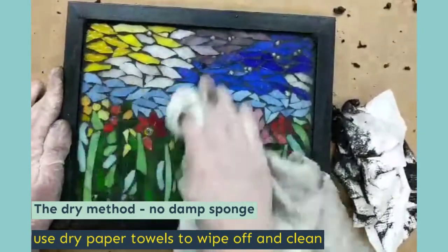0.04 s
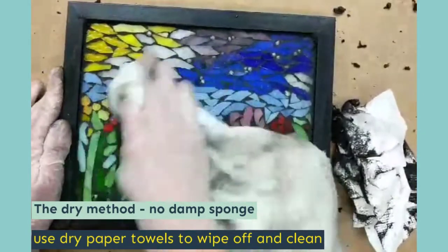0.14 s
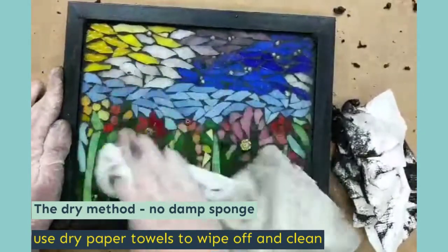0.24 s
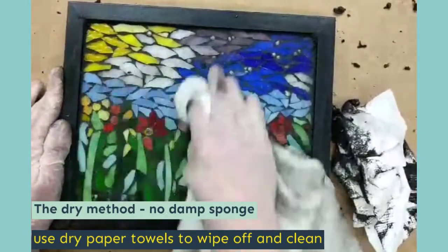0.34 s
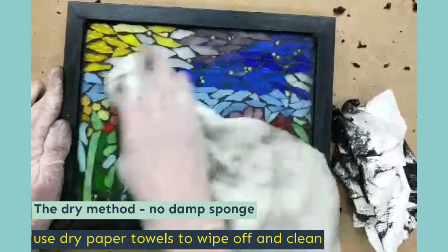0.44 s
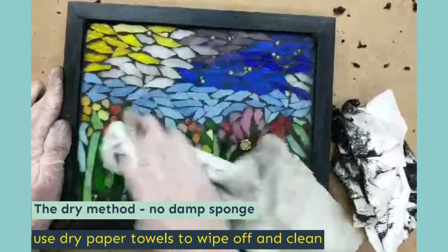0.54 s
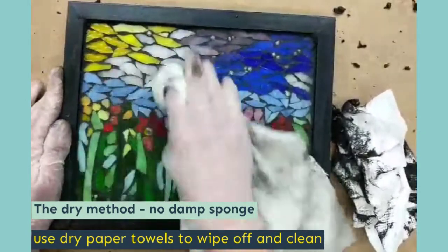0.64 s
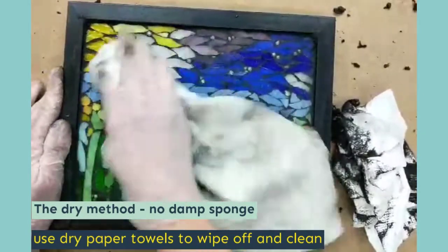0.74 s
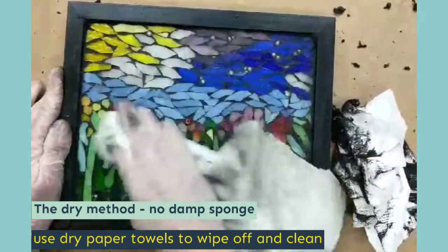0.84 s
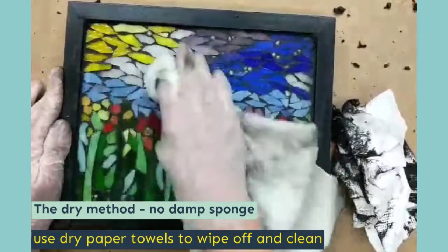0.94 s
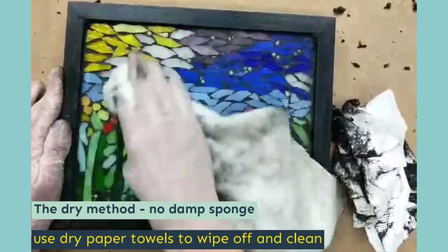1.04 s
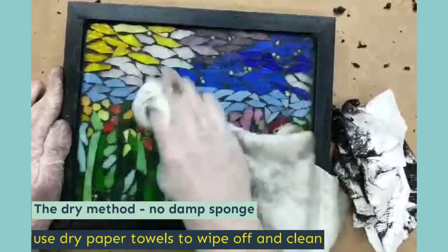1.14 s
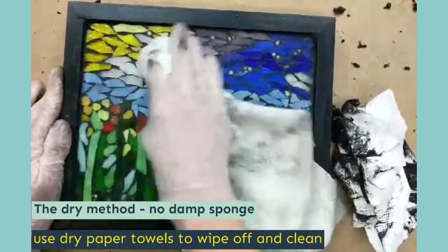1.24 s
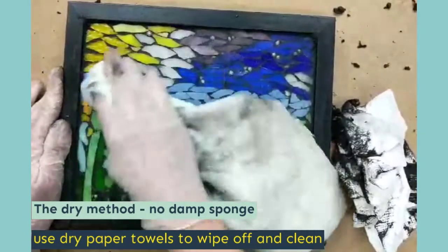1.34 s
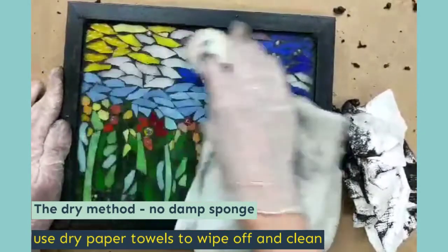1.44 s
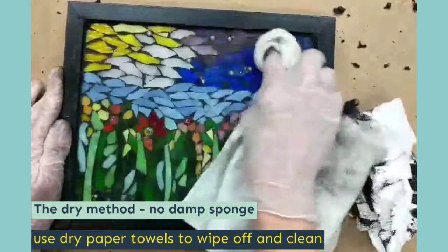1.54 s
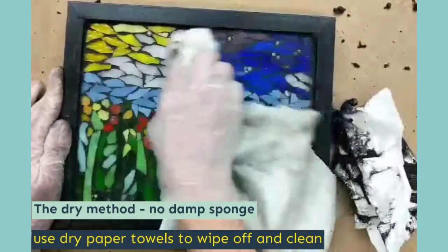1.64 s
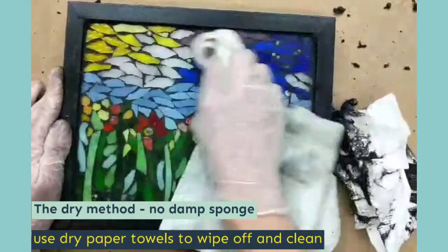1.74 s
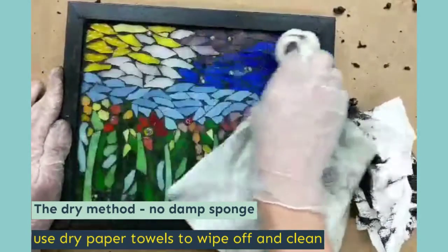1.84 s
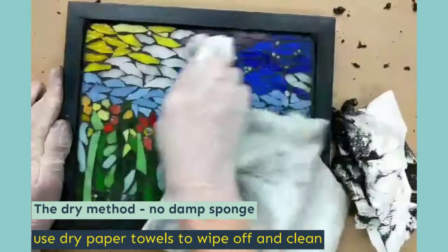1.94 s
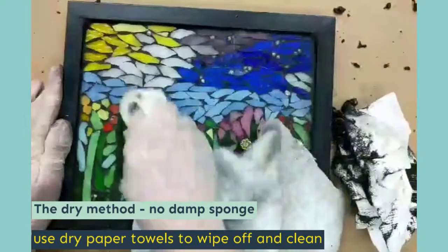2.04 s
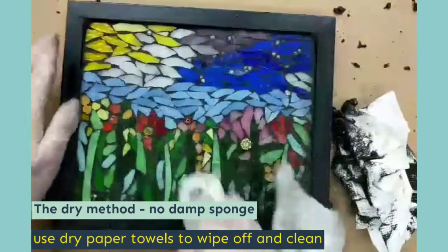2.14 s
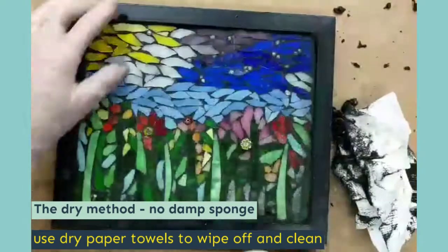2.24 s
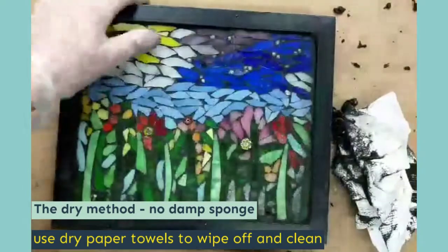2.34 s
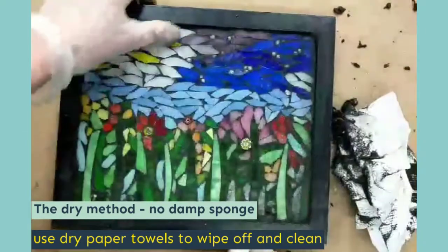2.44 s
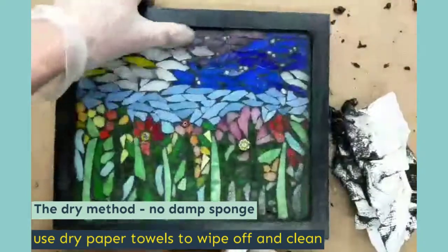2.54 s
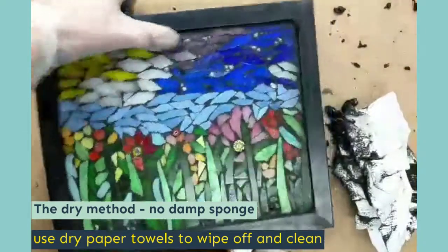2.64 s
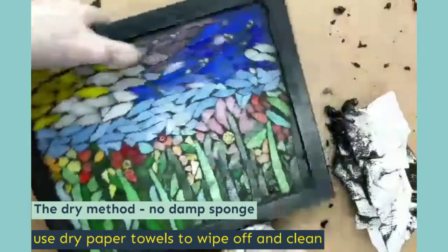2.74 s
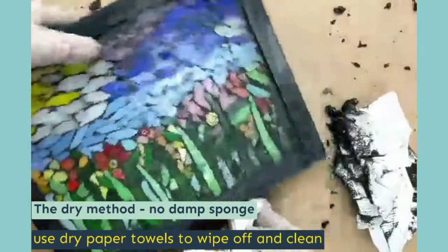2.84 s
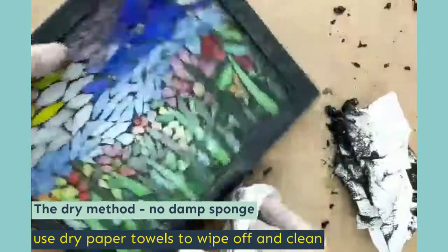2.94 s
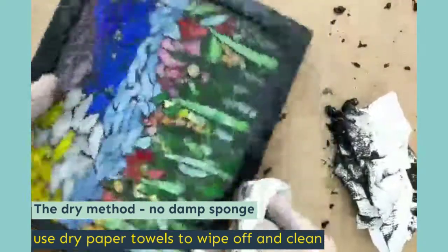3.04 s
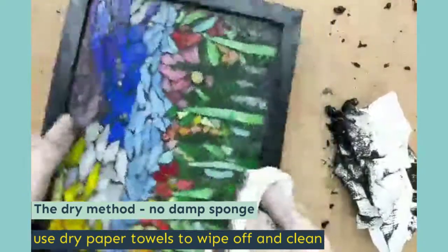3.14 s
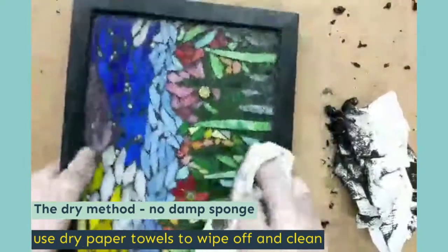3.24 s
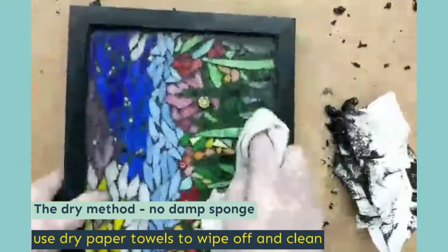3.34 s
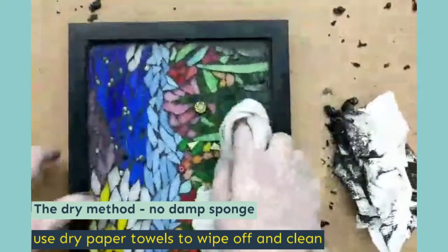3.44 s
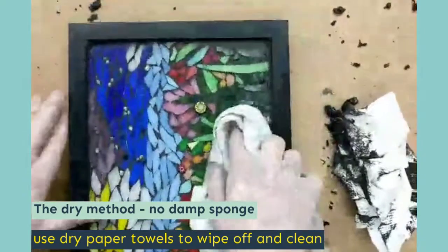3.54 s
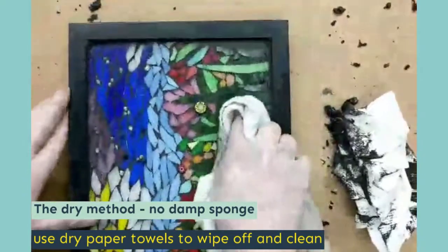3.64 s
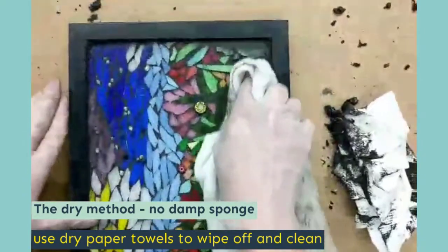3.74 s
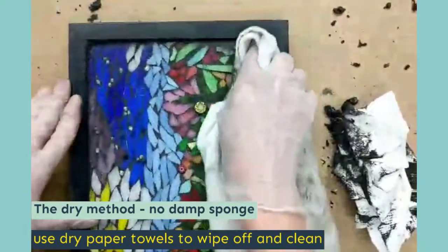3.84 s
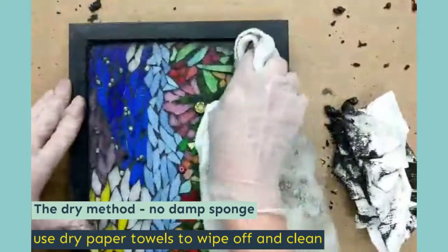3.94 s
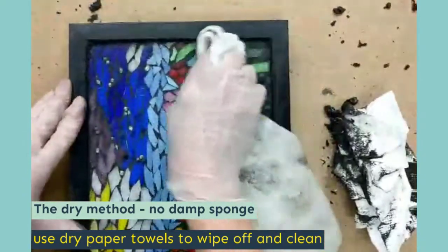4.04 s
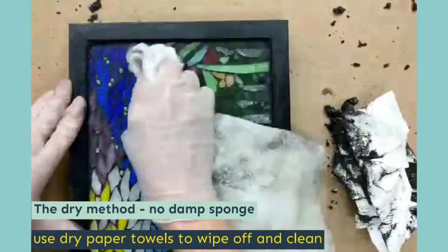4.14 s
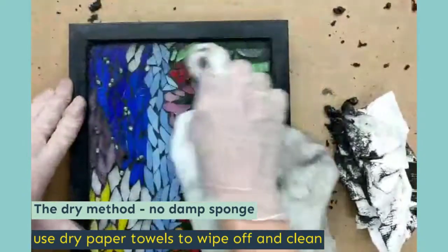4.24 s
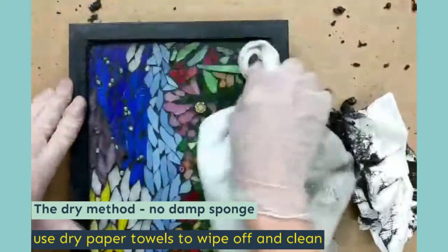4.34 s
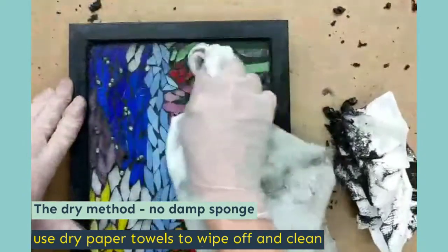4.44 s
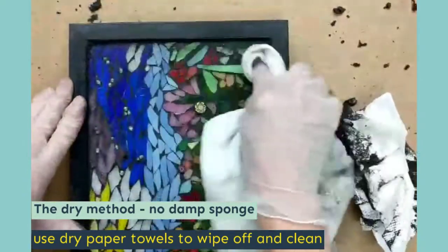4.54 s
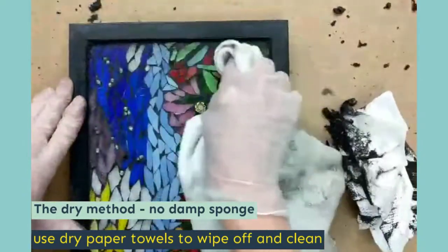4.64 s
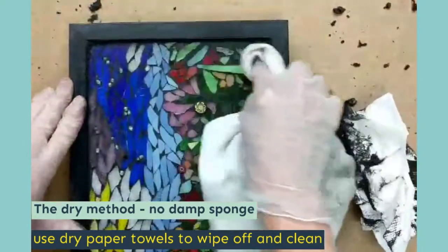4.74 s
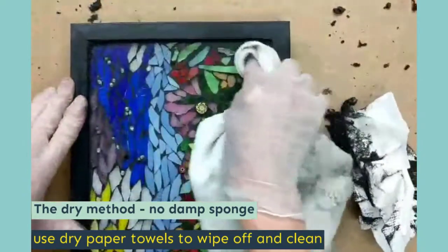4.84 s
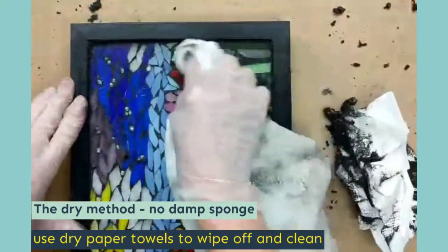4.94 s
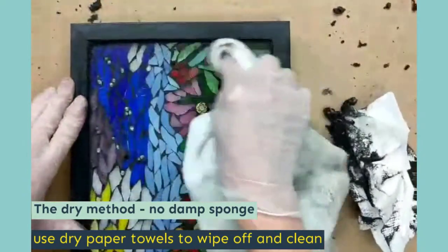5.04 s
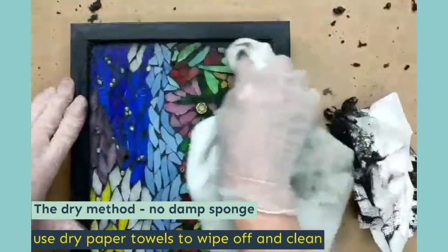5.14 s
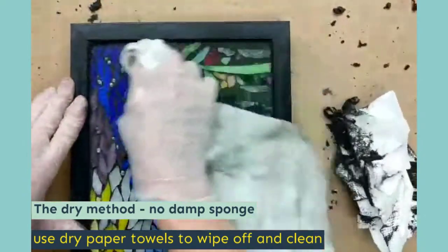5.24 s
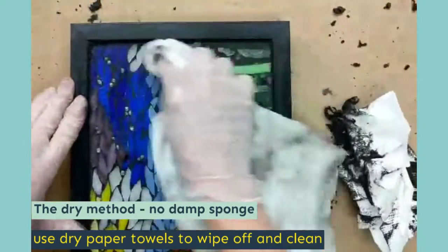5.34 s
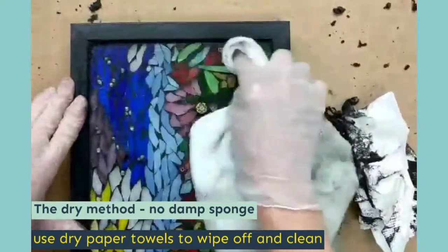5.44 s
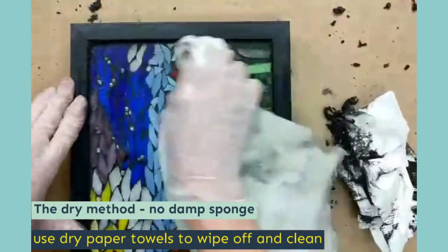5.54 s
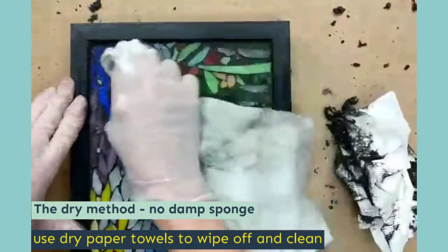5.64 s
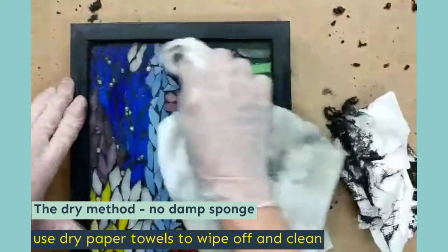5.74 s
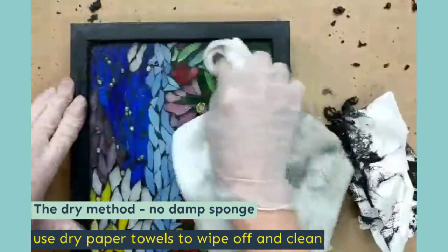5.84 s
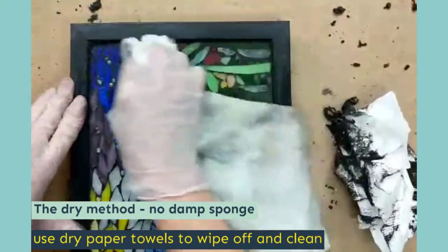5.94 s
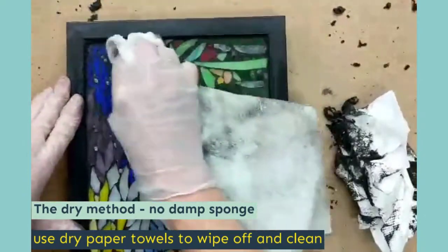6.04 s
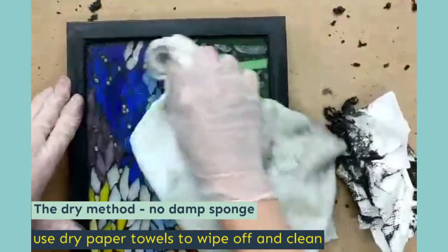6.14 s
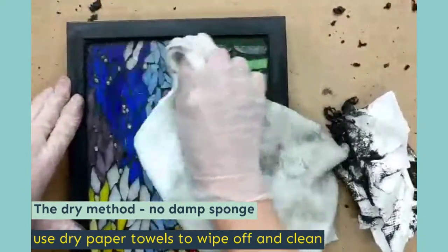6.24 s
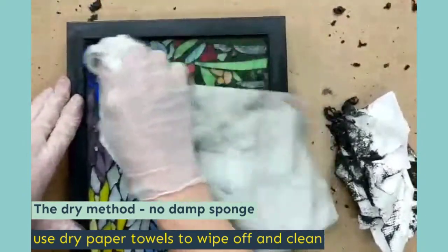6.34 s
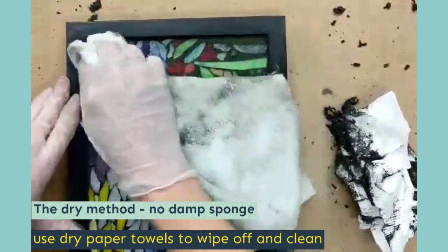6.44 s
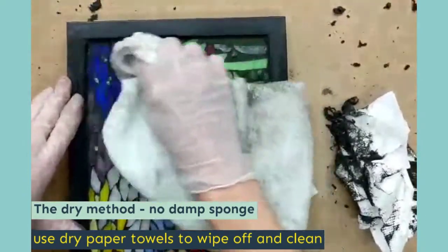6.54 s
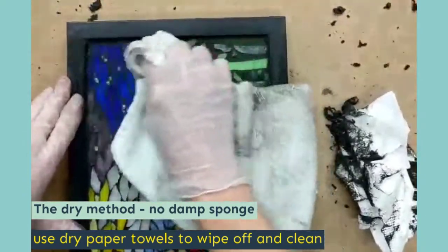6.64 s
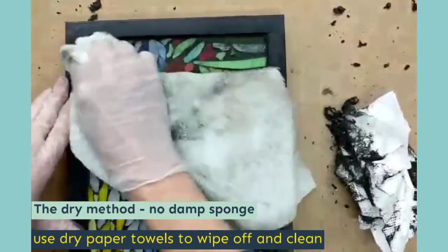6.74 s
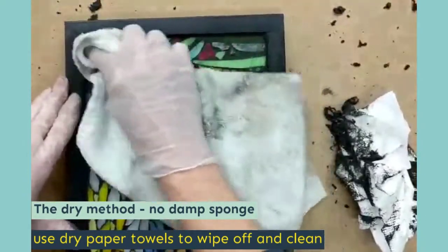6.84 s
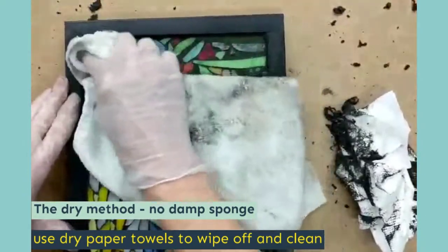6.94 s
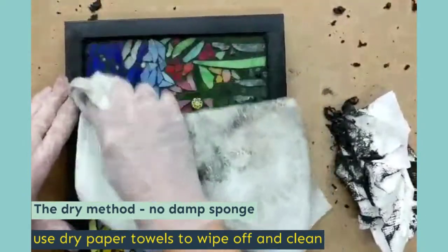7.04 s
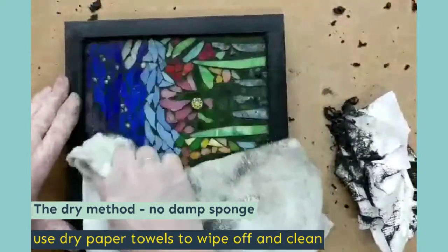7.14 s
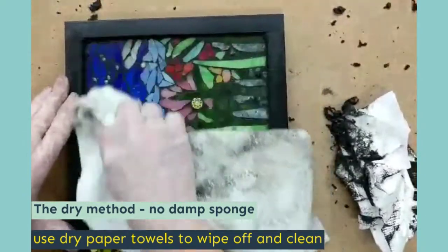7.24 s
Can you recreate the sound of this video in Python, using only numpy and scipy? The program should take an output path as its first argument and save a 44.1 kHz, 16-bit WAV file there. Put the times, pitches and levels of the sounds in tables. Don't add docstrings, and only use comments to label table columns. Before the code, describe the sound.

Dry paper towel scrubs glass tiles in quick hissing strokes, then a wooden frame scrapes round over grit, drops flat, and brighter rubbing resumes.

```python
import sys
import numpy as np
from scipy import signal
from scipy.fft import rfft, irfft
from scipy.io import wavfile
from scipy.ndimage import uniform_filter1d

SR = 44100
rng = np.random.default_rng(int(sys.argv[2]) if len(sys.argv) > 2 else 0)


def decibels_to_gain(level_db):
    exponent = np.asarray(level_db, float) / 20
    return 10 ** exponent


def transcribe(signal):
    frames = np.atleast_2d(signal).T
    limited = np.clip(frames, -1, 1)
    pcm = np.round(limited * 32767).astype(np.int16)
    wavfile.write(sys.argv[1], SR, pcm)


N = 321048

# frequency in Hz, level in dB per Hz.
AIR_SPECTRUM = [(24, -56.5), (40, -18), (100, 2.5), (933, -8.5), (3220, -11), (6950, -25.5), (13300, -13),
                (15000, -39)]
# frequency in Hz, t60 in seconds.
ROOM_DECAY = [(100, .35), (400, 0.39), (2000, 0.17), (10000, 0.096)]
# start in seconds, peak in dB.
TABLE_ROCKS = [(0.114, -62), (0.409, -61), (0.711, -62), (0.992, -69), (1.282, -62), (1.888, -61),
               (2.379, -63), (4.998, -63), (5.289, -57), (5.676, -60.5), (5.98, -60), (6.426, -58),
               (6.77, -54.5), (7.179, -60)]
# start in
# seconds, peak in dB, ring in Hz, t60 in seconds.
FRAME_KNOCKS = [(0.128, -41, 220, .05), (0.398, -39, 230, 0.065), (0.712, -41, 260, .06),
                (0.924, -40, 400, 0.028), (1.262, -42, 260, .06), (2.02, -38, 220, .08),
                (1.488, -35, 233, 0.071), (1.691, -36, 218, 0.047), (2.43, -30, 302, 0.021),
                (2.507, -32.5, 355, 0.059), (2.6, -27, 397, 0.042), (2.726, -28, 612, 0.065),
                (2.775, -13, 571, 0.038), (2.84, -24, 508, 0.062), (3.252, -19.5, 210, 0.018),
                (3.318, -11.5, 578, 0.027), (4.342, -21, 201, 0.013), (4.587, -45.5, 209, 0.082),
                (4.852, -40.5, 274, 0.05), (4.981, -47, 473, 0.11), (5.439, -36.5, 566, 0.035),
                (6.088, -24.5, 380, 0.033), (6.807, -44, 347, 0.074)]
# frequency in Hz, level in dB, t60 in seconds.
TABLE_RING = [(117.8, -25, 0.098), (166.4, -28, 0.17), (323, -35, 0.29), (351, -35, 0.044),
              (417, -34, 0.05)]
# start in seconds, peak in dB, pitch in Hz, t60 in seconds.
FRAME_PINGS = [(2.751, -28, 2150, .015), (2.7555, -26, 1480, .02), (2.759, -30, 2900, .012),
               (2.7745, -17, 1950, .015), (2.7773, -16, 1475, .022), (2.7773, -9, 1880, .024),
               (2.785, -27, 2950, .02), (2.787, -22, 2150, .02), (2.787, -27, 480, .04),
               (2.814, -26, 560, .04), (2.853, -24, 540, .04), (3.252, -29, 2020, .02),
               (3.252, -31, 2450, .03), (3.253, -29, 480, .04), (3.254, -30, 680, .03),
               (3.263, -38, 1720, .03), (3.264, -40, 2500, .02), (3.267, -35, 450, .03),
               (3.308, -32, 520, .04), (3.3155, -28, 1950, .02), (3.316, -36, 2900, .015),
               (3.317, -24, 230, .06), (3.328, -28, 400, .03), (3.336, -33, 600, .04),
               (3.35, -34, 210, .09), (3.362, -35, 1950, .015), (3.407, -35, 560, .04),
               (3.418, -33, 530, .04), (3.422, -30, 2000, .03), (3.427, -32, 980, .03),
               (3.428, -29, 1850, .025), (3.443, -31, 1800, .02), (3.451, -30, 1900, .02),
               (3.456, -19.5, 1760, .025), (3.461, -20, 1430, .024), (3.4758, -19, 2900, .009),
               (3.476, -19, 1800, .015), (3.480, -18, 296, .06), (3.480, -27, 620, .03),
               (3.479, -23, 1104, .04), (3.48, -28, 113, .12), (3.479, -20, 205, .06),
               (3.32, -34, 115, .12), (3.4, -33, 2430, .015), (3.484, -30, 780, .09),
               (3.484, -40, 2336, .045), (4.037, -46, 420, .03), (1.524, -40, 280, .04)]

# start in seconds, peak in dB, ring in Hz, crack level in dB, crack pitch in Hz.
PAPER_CREASES = [(0.099, -40, 2600, -43, 4620), (0.276, -32, 1190, -56, 5890),
                 (0.386, -31, 2600, -39, 8890), (1.697, -29, 2760, -43, 4520),
                 (1.934, -44, 1870, -41.5, 6900), (1.996, -25, 2080, -47, 6930),
                 (2.02, -29, 2420, -34, 4990), (2.259, -54, 1020, -57, 10800),
                 (2.272, -55, 2120, -55, 10100), (2.317, -43, 1870, -40, 11500),
                 (2.362, -53, 982, -47, 10200), (3.83, -50, 2500, -46, 7610),
                 (4.841, -35, 2410, -40.5, 10560), (4.855, -28.5, 2950, -36.5, 11200),
                 (6.007, -27, 2320, -34, 5100), (6.038, -35, 2530, -45, 6900),
                 (6.0725, -19, 2060, -29, 6640), (6.089, -25, 2260, -29.5, 9300),
                 (6.209, -41, 1870, -45.5, 9560), (6.486, -38, 1780, -41, 8080),
                 (6.808, -24, 1990, -41, 7040), (7.023, -41, 2330, -64, 6140),
                 (7.054, -36.5, 1250, -51, 6500), (7.144, -28.5, 2070, -32.5, 5330)]
# start in seconds, peak in dB, ring in Hz, crack level in dB, crack pitch in Hz.
GROUT_CRUMBS = [(2.431, -35, 1400, -56, 4640), (2.502, -32, 1700, -31, 4820),
                (2.538, -32.5, 2120, -42, 5270), (2.586, -35, 2600, -50, 5390),
                (2.596, -30.5, 1660, -30, 4830), (2.613, -29, 1800, -26.5, 4830),
                (2.664, -32, 1700, -42.5, 5270), (2.685, -29, 2200, -30, 9540),
                (2.725, -24, 1870, -37, 9490), (2.757, -23, 1880, -35, 5420),
                (2.775, -22, 1750, -30.5, 9860), (2.778, -20, 1820, -29.5, 9960),
                (2.797, -28, 1640, -26, 11100), (2.812, -17.5, 3890, -24, 4520),
                (2.838, -24, 2020, -25.5, 11000), (2.848, -26, 1830, -33, 11700),
                (2.909, -29, 3040, -49, 4730), (2.928, -28.5, 2930, -35, 10100),
                (3.252, -27, 1730, -36, 6970), (3.316, -30, 950, -43.5, 10000),
                (3.363, -48, 2150, -48, 11000), (3.425, -33, 1910, -39.5, 5130),
                (3.457, -28, 1690, -38.5, 5220)]
# start in seconds, peak in dB, crack pitch in Hz.
PAPER_TICKS = [(2.171, -43.5, 10000), (2.183, -48, 10800), (2.3002, -49, 11500), (2.3421, -38, 11000),
               (3.927, -42, 4640), (4.6206, -46, 4760), (6.7954, -33.5, 7730), (6.8414, -52, 6450)]

# frequency in Hz, level in dB per Hz.
GRIT_SPECTRUM = [(1470, -32), (2500, -7), (4450, -6.5), (6430, -14), (7190, -11), (12300, -9),
                 (13900, -12.5), (15000, -30.5)]
# centre in Hz, width in Hz, level in dB.
FRAME_UPPER_MODES = [(1023, 270, 1.5), (1420, 280, 0), (1870, 350, 7.5), (2430, 910, -10), (3056, 750, -15)]
FRAME_LOWER_MODES = [(115, 83, -5.5), (238.7, 43, 0.5), (380, 52, -6), (581, 160, 3)]
# centre in Hz, width in Hz, level in dB.
TABLE_HUM_MODES = [(178, 80, -6), (377, 70, 0), (520, 200, -14), (888, 200, -17)]
# start in seconds, length in seconds, grit hiss in dB,
# upper tone in dB against the hiss, lower tone in dB against the hiss.
TURN_JERKS = [(2.419, 0.051, -60.5, 9, 4), (2.443, 0.083, -56, -5, -7), (2.497, 0.036, -48.1, 3.5, 2),
              (2.507, 0.27, -50, -6.5, -4.5), (2.592, 0.1, -40, -1.3, -5.5), (2.632, 0.29, -39.5, -4, -0.5),
              (2.707, 0.11, -41.5, 6.5, 2.5), (2.545, .06, -52, 0, 0), (2.735, .05, -40, 3, 2),
              (2.782, .05, -37, 1, 0), (2.855, .07, -51, 3, 2), (2.925, .015, -47, 0, -5),
              (2.755, 0.1, -36, -5.8, 4), (2.823, 0.063, -37.5, -1, 4), (2.845, 0.081, -51, -5, -9),
              (2.9, 0.077, -51, 2, -0.5)]
# start in seconds, length in seconds, grit hiss in dB,
# panel tone in dB against the hiss, table tone in dB against the hiss.
EDGE_TILTS = [
    (3.253, 0.06, -53.5, 6, 17.7),
    (3.303, 0.054, -51, 4, 20),
    (3.323, 0.095, -51.5, 3, 3.7),
]
# start in seconds, length in seconds, grit hiss in dB,
# squeal in dB against the hiss, table tone in dB against the hiss.
LAST_SLIDES = [
    (3.395, 0.067, -39.5, -2, -1),
    (3.415, 0.03, -44, 5, -3),
    (3.442, .034, -45, 7, -4),
]
# level in dB, t60 in seconds.
DROP_RATTLE = [
    (-44, .09),
    (-37, 0.2),
    (-48, 0.51),
]

# frequency in Hz, level in dB per Hz.
FIBRE_SPECTRUM = [(1470, -51.5), (2500, -3), (3610, -2), (7190, 0), (10900, -5), (13600, -7),
                  (14300, -23.5), (15000, -44)]
# centre in Hz, width in Hz, level in dB.
PANEL_MODES = [(830, 890, -3.5), (1160, 660, 0), (1770, 1160, 2), (2240, 650, -1.5), (3240, 1600, -13)]
TABLE_MODES = [(102.4, 40, -2.5), (168, 140, -4.5), (222, 31, 1), (287, 49, -1.5), (366, 110, -0.5),
               (496, 84, -2), (657, 100, -5.5)]
# start in seconds, length in seconds, fibre hiss in dB, pressure in dB.
BUFFING_BEFORE = [(-0.075, 0.24, -53.5, 2), (0.057, 0.13, -54.4, 2.5), (0.154, 0.195, -50.5, 3),
                  (0.271, 0.21, -53.3, 1), (0.458, 0.18, -52.5, 4), (0.564, 0.25, -57, 4.5),
                  (0.714, 0.2, -57, -16), (0.75, 0.245, -56.0, 4.5), (0.906, 0.2, -59, 5),
                  (1.056, 0.15, -56, 0.9), (1.185, 0.14, -61, 5.5), (1.304, 0.11, -54, -1),
                  (1.424, 0.19, -52.5, -0.3), (1.64, 0.121, -50, 0.8), (1.772, 0.15, -52.5, 0.5),
                  (1.928, 0.19, -51, 3.5), (2.04, 0.18, -58, 1.5), (2.236, 0.06, -70, -20.0),
                  (2.293, 0.112, -54.5, -5.5), (2.394, 0.04, -59, -23)]
BUFFING_AFTER = [(3.498, 0.24, -59, -3.5), (3.675, 0.17, -57, -4.5), (3.752, 0.152, -53, -6),
                 (3.81, 0.16, -61.5, -4.5), (3.899, 0.38, -53, -5.5), (4.015, 0.265, -51.5, -0.5),
                 (4.207, 0.21, -50.5, -5.5), (4.415, 0.12, -50.3, -8.8), (4.52, 0.13, -52.5, -8.5),
                 (4.653, 0.097, -57, -11), (4.777, 0.053, -56.1, -14), (4.804, 0.096, -46.5, -5.5),
                 (4.897, 0.16, -53, -7.5), (5.053, 0.13, -49, -11.5), (5.171, 0.2, -48, -5),
                 (5.333, 0.24, -50, -5.5), (5.523, 0.22, -48.5, -3.5), (5.692, 0.24, -50.7, -2.6),
                 (5.886, 0.19, -49.9, -3), (6.003, 0.14, -44.5, -1.0), (6.074, 0.26, -55.4, -0.5),
                 (6.256, 0.26, -52.5, -4.5), (6.461, 0.067, -60.7, 3.8), (6.477, 0.23, -54.7, -1.5),
                 (6.674, 0.231, -50, -2), (6.802, 0.2, -61.8, -0.2), (6.971, 0.29, -50.5, -1.5),
                 (7.219, 0.12, -58.6, -3)]
# start in seconds, length in seconds, hiss in dB, pressure in dB.
GRIP_SHUFFLES = [
    (2.902, 0.21, -63, 1.04),
    (3.04, 0.33, -65.5, 7.1),
]
# start in seconds, length in seconds, hiss in dB, pressure in dB.
EDGE_CATCHES = [(.43, .07, -59, 2), (.685, .05, -61, 4), (1.0, .055, -61, 4), (1.11, .05, -63, 4),
                (1.23, .05, -61, 4), (1.365, .035, -59, 3), (1.51, .03, -58, 3), (1.6, .05, -65, 0),
                (1.72, .022, -54, 2), (2.005, .025, -51, 2), (3.66, .09, -63, -2), (4.15, .06, -61, 6),
                (4.23, .05, -60, 0), (4.325, .035, -58, -2), (4.47, .03, -61, 3), (4.965, .03, -54, 0),
                (5.005, .025, -54, -2), (5.435, .02, -54, 0), (5.675, .03, -59, 0), (5.85, .04, -60, 1),
                (6.055, .016, -52, 3), (6.072, .036, -48, 0), (6.12, .05, -61, 2), (6.4, .03, -51, 0),
                (6.51, .05, -60, 0), (6.71, .05, -58, -3), (6.815, .032, -53, 3)]

# ring time in seconds at 2 kHz, sharpness of the ring, first break against the crackle.
CREASE, CRUMB, TICK = (0.016, 1.1, 1.7), (0.015, 2.9, 0.67), (0.012, 0.81, 3.1)
# rumble in dB against the hiss, its change per
# pressure dB, sheen in dB against the hiss, its change per pressure dB.
PUSH_BEFORE, PUSH_AFTER = (-1.7, 1.06, -3, -0.44), (-0.6, 0.48, -2.3, -0.37)
# lean of hiss and tone, lean of rumble (under 1 = early top), sharpness, rest level in dB.
ARCH_BEFORE, ARCH_AFTER = (0.93, 1.17, 1.5, -64), (1.19, 1.47, 3, -69.5)
ARCH_JERK, ARCH_TILT = (0.25, 0.66, 1.17, -63), (0.9, 0.1, 1, -66)
ARCH_CATCH = (0.9, 1.1, 0.8, -85)
DROP_S = 3.4793


def evened(x):
    return x / np.sqrt(np.mean(x ** 2) + 1e-20)


def read(points, hz):
    f, value = np.transpose(points)
    return np.interp(np.log(hz + 1), np.log(f + 1), value)


def add(mix, s, sound):
    part = mix[round(s * SR):][:len(sound)]
    part += sound[:len(part)]


def coloured(x, points):
    gain = decibels_to_gain(read(points, np.fft.rfftfreq(N, 1 / SR)))
    return evened(irfft(rfft(x) * gain, N))


def body(x, modes):
    f = np.fft.rfftfreq(N, 1 / SR) + 1
    power = sum(decibels_to_gain(2 * db) / (1 + ((f - hz ** 2 / f) / width) ** 2) ** 2 for hz, width, db in modes)
    return evened(irfft(rfft(x) * np.sqrt(power), N))


def resonate(x, hz, width):
    turn = np.exp(2j * np.pi * np.cumsum(hz) / SR)
    r = np.exp(-np.pi * width / SR)
    return 2 * (turn * signal.lfilter([1 - r], [1, -r], x / turn)).real


def patchy(x, depth_db, bins, frames):
    z = signal.stft(x, nperseg=256)[2]
    field = uniform_filter1d(rng.standard_normal(z.shape), bins, 0)
    field = evened(uniform_filter1d(field, frames, 1))
    return evened(signal.istft(z * decibels_to_gain(depth_db * field), nperseg=256)[1][:N])


def slips(per_s, spread_db, clump_db, clump_s):
    size = decibels_to_gain(spread_db * np.minimum(rng.exponential(1, N), 5)) * rng.choice([-1, 1], N)
    span = max(int(clump_s * SR), 2)
    clumps = uniform_filter1d(rng.standard_normal(N), span)
    clumps = evened(uniform_filter1d(clumps, span))
    happens = rng.random(N) < per_s / SR
    return evened(size * happens * decibels_to_gain(clump_db * clumps))


def rubbing(rows, layers, trims_db, arch):
    lean, low_lean, sharp, rest_db = arch
    power = np.zeros((len(layers), N))
    first, last = max(round(rows[0][0] * SR), 0), round(sum(rows[-1][:2]) * SR)
    power[:, first:last] = decibels_to_gain(2 * rest_db)
    for s, length, hiss_db, *others_db in rows:
        u = np.arange(0, length, 1 / SR)[max(round(-s * SR), 0):] / length
        leans = [lean] * len(others_db) + [low_lean]
        for out, db, k in zip(power, (0, *others_db), leans):
            push = abs(np.sin(np.pi * u ** k)) ** sharp
            add(out, max(s, 0), (decibels_to_gain(hiss_db + db) * push) ** 2)
    return sum(layer * decibels_to_gain(db) * np.sqrt(p) for layer, db, p in zip(layers, trims_db, power))


def pressed(rows, push):
    rumble_db, rumble_per_db, sheen_db, sheen_per_db = push
    return [(*row, sheen_db + sheen_per_db * np.clip(row[-1], -8, 8), rumble_db + rumble_per_db * row[-1])
            for row in rows]


def table_after(t):
    return sum(decibels_to_gain(db - 60 * t / t60) * np.sin(2 * np.pi * hz * t) for hz, db, t60 in TABLE_RING)


def air():
    drift = patchy(rng.standard_normal(N), depth_db=8.0, bins=10, frames=30)
    return decibels_to_gain(-65.5) * coloured(drift, AIR_SPECTRUM)


def room(x):
    taps = np.zeros(SR // 2)
    at = np.arange(300, len(taps) - 20, 20)
    taps[at + rng.integers(0, 20, len(at))] = rng.choice([-1., 1.], len(at))
    hz, t, z = signal.stft(taps, SR, nperseg=256)
    fade = decibels_to_gain(-60 * t / read(ROOM_DECAY, hz)[:, None])
    tail = signal.istft(z * fade, SR, nperseg=256)[1]
    return signal.fftconvolve(x, tail / np.linalg.norm(tail))[:N]


def shake():
    out, t = np.zeros(N), np.arange(SR // 5) / SR
    swell = t / 0.011 * np.exp(1 - t / 0.02)
    for s, db in TABLE_ROCKS:
        hz = 88 + 28 * rng.random()
        add(out, s - 0.015, decibels_to_gain(db - 2.0) * swell * np.sin(2 * np.pi * hz * t))
    return out


def knocks():
    out, t = np.zeros(N), np.arange(SR // 2) / SR
    rise = 1 - np.exp(-(t / 0.0022) ** 2)
    after = table_after(t)
    for s, db, hz, t60 in FRAME_KNOCKS:
        ring = decibels_to_gain(-60 * t / np.clip(t60, 0.015, 0.2)) * np.sin(2 * np.pi * hz * t)
        add(out, s, decibels_to_gain(db + 2.0) * rise * (ring + decibels_to_gain(0.4 * db) * after))
    return out


def pings():
    out, t = np.zeros(N), np.arange(SR // 8) / SR
    for s, db, hz, t60 in FRAME_PINGS:
        rise = 1 - np.exp(-t / (0.07 * t60))
        add(out, s, rise * decibels_to_gain(db + 4.0 - 60 * t / t60) * np.sin(2 * np.pi * hz * t))
    return out


def drop():
    out, t = np.zeros(N), np.arange(SR // 2) / SR
    hz, extra_hz, sag_s, rise_s, t60 = 368, 58, 0.006, 0.0011, 0.037
    turns = hz * t + extra_hz * sag_s * (1 - np.exp(-t / sag_s))
    rise = 1 - np.exp(-(t / rise_s) ** 2)
    boom = decibels_to_gain(-60 * t / t60) * np.sin(2 * np.pi * turns)
    add(out, DROP_S, decibels_to_gain(1.0) * rise * (boom + table_after(t)))
    return out


def snaps():
    out, t = np.zeros(N), np.arange(2000) / SR
    bright = signal.butter(2, 4200, "high", fs=SR, output="sos")
    rows = [(*row, *CREASE) for row in PAPER_CREASES]
    rows += [(*row, *CRUMB) for row in GROUT_CRUMBS]
    rows += [(s, db - 4.5, 1990, db - 6.0, hz, *TICK) for s, db, hz in PAPER_TICKS]
    rows += [(3.4765, -14, 780, -30, 4499.5, *CREASE)]
    for s, db, hz, crack_db, crack_hz, length, sharp, spike in rows:
        decay = decibels_to_gain(-60 * t / (length * (2000 / hz) ** 0.67))
        fade = decay * (1 - np.exp(-t / 0.00026))
        first_break = spike * np.exp(-((t - 0.0003) / 0.00005) ** 2)
        ring_noise, crack_noise = rng.standard_normal((2, len(t))) + first_break
        wide = signal.iirpeak(hz, sharp, SR)
        rung = evened(signal.lfilter(*wide, signal.lfilter(*wide, ring_noise)))
        ring = 0.61 * np.sin(2 * np.pi * hz * t) + 0.5 * rung
        crack = 0.37 * signal.sosfilt(bright, crack_noise)
        crack += 1.1 * signal.lfilter(*signal.iirpeak(crack_hz, 2.2, SR), crack_noise)
        ring *= decibels_to_gain(db - 1.84) / abs(fade * ring).max()
        add(out, s + 0.0008, fade * (ring + decibels_to_gain(crack_db + 6.5) * crack))
    return out


def drag():
    force = slips(per_s=8000, spread_db=2.9, clump_db=2.1, clump_s=0.0018)
    force = patchy(force, depth_db=2.5, bins=8, frames=6)
    t = np.arange(N) / SR
    hiss, panel, table = coloured(force, GRIT_SPECTRUM), body(force, PANEL_MODES), body(force, TABLE_MODES)
    frame = hiss, body(force, FRAME_UPPER_MODES), body(force, FRAME_LOWER_MODES)
    out = rubbing(TURN_JERKS, frame, [-0.6, -0.6, -0.6], ARCH_JERK)
    out += rubbing(EDGE_TILTS, (hiss, panel, table), [-1.5, -1.5, -2.5], ARCH_TILT)

    settling = hiss, panel, table, body(force, TABLE_HUM_MODES)
    for layer, (db, t60) in zip(settling, [*DROP_RATTLE, (-38.5, 0.6)]):
        out += (t > DROP_S) * layer * decibels_to_gain(db - 60 * abs(t - DROP_S) / t60)

    hz = np.clip(2320 - 10500 * (t - 3.4), 1200, 2320)
    squeal = evened(resonate(resonate(force, hz, 800), hz, 850))
    squeal = 0.6 * squeal + 0.82 * panel
    slide = rubbing(LAST_SLIDES, (hiss, squeal, table), [-0.6, -0.6, -0.6], ARCH_TILT)
    return out + (t < DROP_S) * slide


def towel():
    force = slips(per_s=14000, spread_db=2.7, clump_db=1.5, clump_s=0.0025)
    force = patchy(force, depth_db=2.0, bins=6, frames=14)
    edge = np.interp(np.arange(N) / SR, [1.15, 1.5], [0, 1])
    middle = body(force, [(0.91 * hz, width, db) for hz, width, db in PANEL_MODES])
    panel = np.sqrt(1 - edge) * middle + np.sqrt(edge) * body(force, PANEL_MODES)
    hiss = coloured(force, FIBRE_SPECTRUM)
    dull = signal.sosfiltfilt(signal.butter(2, 7400, fs=SR, output="sos"), hiss)
    sheen = hiss - dull
    rumble = body(np.roll(force, shift=300), TABLE_MODES[1:])
    layers = dull, panel, sheen, rumble
    out = rubbing(pressed(BUFFING_BEFORE, PUSH_BEFORE), layers, [-0.51, -0.4, -0.11, 0], ARCH_BEFORE)
    out += rubbing(pressed(GRIP_SHUFFLES, PUSH_BEFORE), layers, [-3.5, -1.5, 2.0, 4.0], ARCH_AFTER)
    out += rubbing(pressed(EDGE_CATCHES, PUSH_AFTER), layers, [-3., -3., -3., -3.], ARCH_CATCH)
    out += rubbing(pressed(BUFFING_AFTER, PUSH_AFTER), layers, [-0.4, -0.44, -0.06, 0], ARCH_AFTER)
    return out


def scene():
    near = shake() + knocks() + pings() + drop() + snaps() + drag() + towel()
    return (near + decibels_to_gain(-23.5) * room(near) + air())[None]


def low_pass(x):
    return signal.sosfilt(signal.butter(12, 15380, fs=SR, output="sos"), x)


def record(dry):
    thin = signal.sosfilt(signal.butter(4, 80, "high", fs=SR, output="sos"), dry)
    return low_pass(thin)


dry = scene()
out = record(dry)
transcribe(out)
```